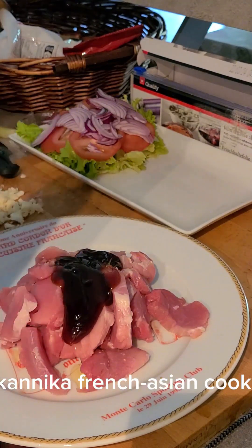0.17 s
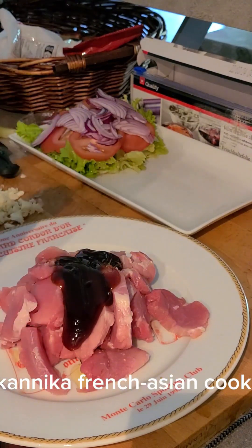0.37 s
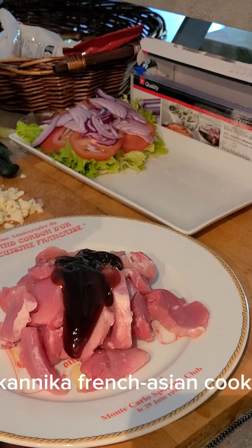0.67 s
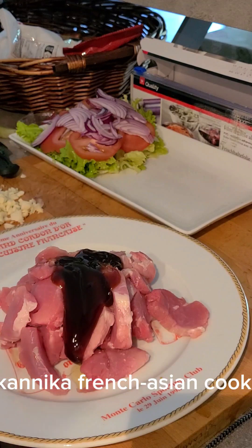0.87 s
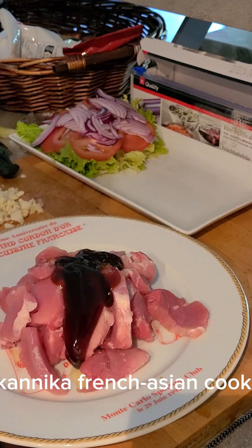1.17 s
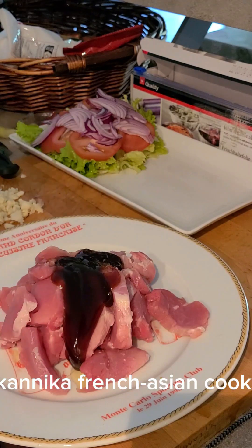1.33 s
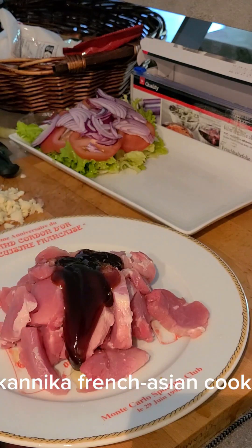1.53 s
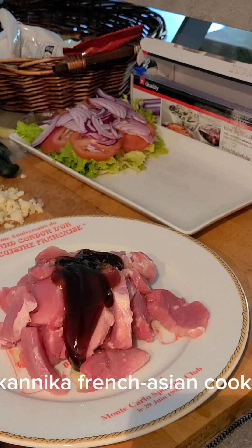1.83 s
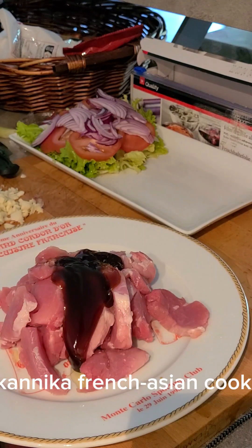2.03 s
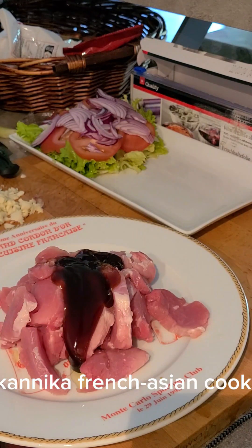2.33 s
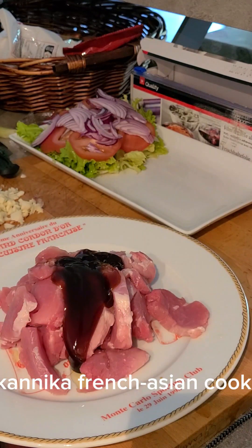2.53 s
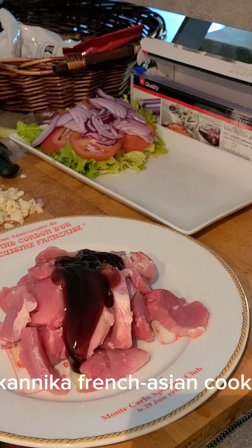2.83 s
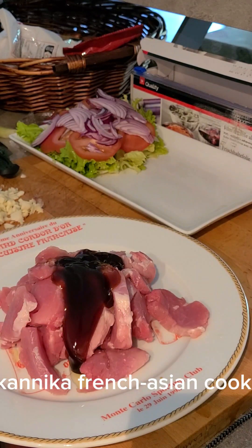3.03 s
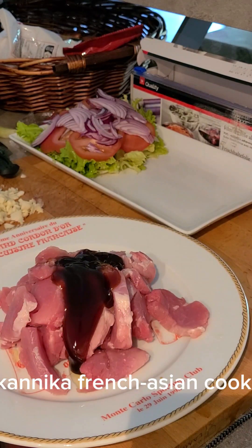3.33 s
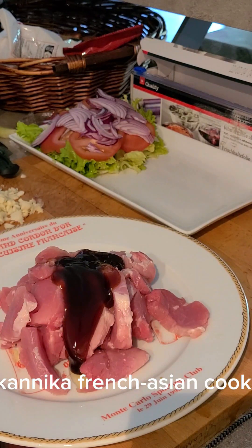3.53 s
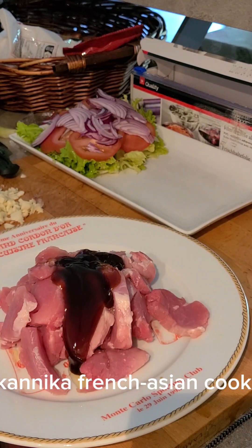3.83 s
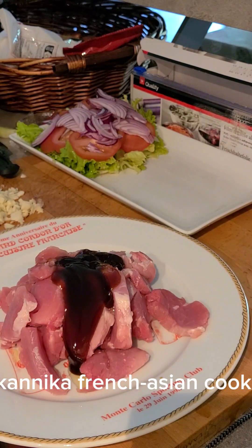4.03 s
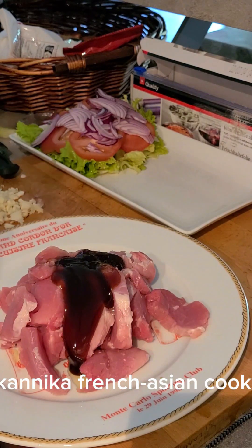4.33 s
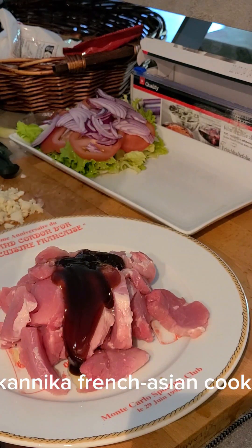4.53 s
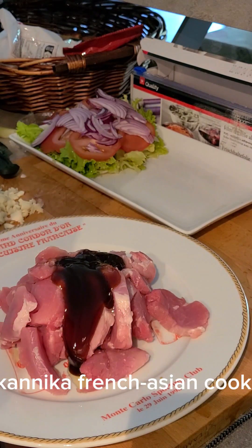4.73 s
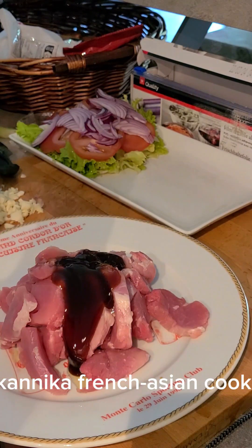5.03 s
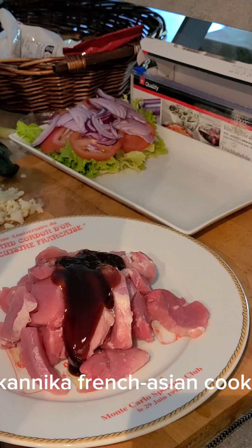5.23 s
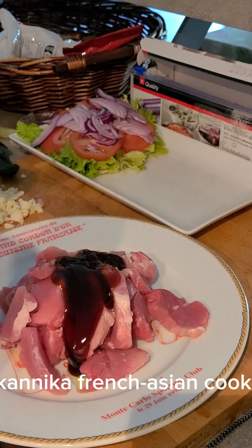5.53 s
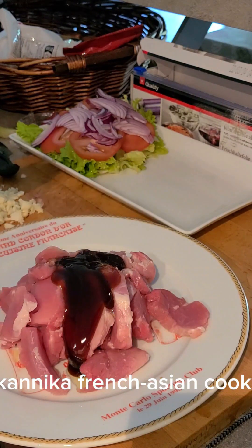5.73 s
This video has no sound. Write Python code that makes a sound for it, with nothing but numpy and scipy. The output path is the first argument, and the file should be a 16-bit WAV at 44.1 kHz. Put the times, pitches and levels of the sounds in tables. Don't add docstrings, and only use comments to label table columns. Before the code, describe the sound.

Close phone pickup in a small, moderately live kitchen. Fridge hum runs beneath sparse handling noises: soft touches, a sharp glassy clink that bounces, a cap popping loose. The loudest event is a deep wooden blow before the middle, bouncing and rattling into low bumps. Afterwards come a tiny metallic tinkle, scuffs, a dry sliding palm, a crisp double snap ringing a tin, then little clinks dying away.

```python
import sys
import numpy as np
from scipy import signal
from scipy.fft import rfft, irfft, next_fast_len
from scipy.io import wavfile
from scipy.ndimage import uniform_filter1d

SR = 44100
rng = np.random.default_rng(int(sys.argv[2]) if len(sys.argv) > 2 else 0)


def gain_from_decibels(decibels):
    exponent = np.asarray(decibels, float) / 20
    return 10 ** exponent


def persist_wave(psi):
    counts = np.round(np.clip(psi, -1, 1) * 32767).astype(np.int16)
    wavfile.write(sys.argv[1], SR, np.atleast_2d(counts).T)


N = 260057
LONG, SHORT = 24000, 6000

# time in seconds, level in dB.
DRONE_LEVEL = [(0, -44.5), (.25, -52), (.6, -51.5), (1.0, -51.5), (1.3, -49.5), (2.2, -53.5), (3.0, -52.5),
               (3.51, -49), (3.96, -53.5), (4.6, -49), (5.1, -49.5), (5.4, -49), (5.7, -52), (5.9, -49)]
# frequency in Hz, density in dB per Hz.
FRIDGE_SPECTRUM = [(12, -49), (20, -28.5), (38, -13.5), (75, -11), (97, -6), (114, 2.5), (132, -5),
                   (166, -12), (211, -17), (245, -13), (398, -20), (437, -20.5), (500, -27.5), (650, -40.5),
                   (1100, -120)]
# time in seconds, level in dB, swell in seconds, fade in seconds.
FRIDGE_SHUDDER = [
    (2.6, -39, 0.16, 0.097),
]
# frequency in Hz, width in Hz, level in dB.
MOTOR_WHINES = [(633.4, 12, -69), (1240, 54, -71), (3272, 61, -69.5)]
# frequency in Hz, density in dB per Hz.
AIR_SPECTRUM = [(180, -22), (300, -4.5), (437, -20), (557, -6), (621, -12.5), (995, -14), (1230, -15.5),
                (1620, -22), (2290, -22.5), (3040, -23), (3340, -21), (5140, -25.5), (7500, -29),
                (9750, -98), (16500, -120)]
# frequency in Hz, density in dB per Hz.
HISS_SPECTRUM = [(7000, -57), (7700, -27), (8300, -6.5), (10500, -4.5), (11500, 1.5), (15000, -2.5),
                 (15800, -11)]
# frequency in Hz, T60 in seconds.
ROOM_T60 = [(100, 0.39), (400, 0.43), (1500, 0.42), (4000, 0.42), (10000, 0.28), (15000, 0.4)]
# frequency in Hz, left over right in dB.
PORT_BALANCE = [(60, -2.5), (110, -1.5), (200, -3), (380, -3.5), (700, -3.5), (1290, -3), (2380, -6),
                (4400, -8), (8120, -5.5), (15000, -4)]
# time in seconds, lead of the left port in samples.
LEFT_LEAD = [(0, 6), (.03, -2), (.4, -12), (.9, -12), (1, 12), (1.4, 7), (2, 7), (2.4, 0), (3, -4),
             (4.7, -4), (4.8, 7), (5.9, 9)]

# time of most pressure in seconds, level in dB, sizzle in dB,
# swell in seconds, fade in seconds.
BRUSH_STROKES = [(0.027, -55, 4.5, 0.0043, 0.047), (0.666, -63, 8, 0.0058, 0.023),
                 (0.68, -52.5, -16, 0.022, 0.13), (1.27, -64, -9, 0.049, 0.085),
                 (1.39, -57, -12, 0.057, 0.2), (1.811, -54.5, -2.5, 0.088, 0.098),
                 (2.417, -58, 6.5, 0.064, 0.01), (2.445, -38.5, -7, 0.023, 0.034),
                 (2.925, -56, 4.5, 0.15, 0.13), (3.01, -61, -17, 0.027, 0.1),
                 (3.396, -54, -33, 0.0099, 0.085), (3.76, -60.5, -26, 0.14, 0.1),
                 (3.84, -59, -1, 0.055, 0.044), (3.878, -67, 15.5, 0.015, 0.076),
                 (4.06, -60, -4, 0.11, 0.37), (4.27, -65, -35, 0.32, 0.13), (4.37, -43, -4, 0.076, 0.28),
                 (4.813, -46.5, 14, 0.0017, 0.03), (4.843, -54.5, 15, 0.048, 0.097)]
# frequency in Hz, density in dB per Hz.
CLOTH_SPECTRUM = [(240, -29), (400, -11), (575, -4), (644, -10.5), (1020, -14), (1100, -2), (1330, -18),
                  (1510, -8), (3920, -5.5), (6800, -15.5), (8000, -37), (10400, -53), (17600, -120)]
# frequency in Hz, density in dB per Hz.
SIZZLE_SPECTRUM = [(5000, -8.5), (7500, 1), (9000, -8), (13000, -4), (15700, -3.5)]
# time in seconds, level in dB, swell in seconds, fade in seconds.
PALM_RUB = [
    (4.38, -45.5, 0.24, 0.28),
]
# frequency in Hz, width in Hz, level in dB.
SKIN_BANDS = [(2900, 1000, 0), (4030, 1500, -1), (5340, 1100, -17.5)]

# time in seconds, peak in dB, ring in Hz, sizzle in dB.
TICKS = [(0.0265, -38.5, 5730, -16), (0.3542, -45, 5900, -8), (0.4771, -41.5, 5540, -29),
         (0.529, -23, 5800, -17), (0.5507, -34.5, 6170, -8.5), (0.552, -40, 11500, -6.5),
         (0.5577, -34, 3300, -13.5), (0.562, -40, 9000, -3), (0.577, -54, 6000, -5.5),
         (0.6635, -41, 13000, -3), (0.668, -44, 11500, -8), (0.9343, -52.5, 3740, -22.5),
         (1.2795, -44, 9300, -3), (2.382, -47, 4070, -1), (2.4354, -27.5, 3350, -8),
         (3.8745, -32, 5700, -20), (4.0709, -37.5, 5030, -9), (4.5565, -33.5, 5300, -17),
         (4.557, -38, 7500, -17), (4.5702, -38, 4200, -26), (4.571, -48, 5800, -20),
         (4.621, -51, 6500, -13), (4.9716, -36.5, 7040, -17.5), (4.9813, -36.5, 11820, -6.5),
         (4.9973, -35.5, 6000, -28), (5.0424, -32, 4850, -12), (5.068, -52, 5000, -2),
         (5.0538, -35.5, 6800, -22.5), (5.1015, -44, 8930, -14.5), (5.1814, -47, 5300, -18),
         (5.1955, -44, 6960, -8), (5.5744, -51, 5300, 1), (5.7412, -36, 11400, -19.5)]
# time in seconds, peak in dB, ring in Hz, sizzle in dB.
SNAPS = [(1.0545, -10.5, 6320, -26), (1.0579, -15, 4780, -20), (1.059, -52, 6660, -23),
         (1.4706, -35, 6700, -19.5), (1.4839, -25, 6400, -12.5), (1.489, -26, 3280, -5),
         (4.8093, -18.5, 7000, -9), (4.813, -17, 13200, -1), (4.8133, -23, 13200, -10),
         (4.8129, -17, 6300, -7.5), (4.8145, -17.5, 11800, -4), (4.833, -19, 6900, -3),
         (4.848, -29, 6300, -10), (4.826, -24, 5550, 4), (4.842, -28.5, 11800, -8),
         (4.8412, -25, 5270, -21.5), (4.845, -26, 5840, -7)]
# time in seconds, peak in dB, ring in Hz, T60 in seconds.
TAPS = [(0.4775, -46, 3000, 0.014), (0.478, -45, 555, .03), (0.5285, -37, 2150, 0.03),
        (0.5275, -36.5, 447, .015), (0.55, -30.5, 3100, .04), (0.55, -32, 1690, 0.016),
        (0.5573, -30, 1490, 0.027), (0.669, -41, 2000, 0.055), (0.7445, -43, 2800, .014),
        (0.829, -50, 1800, .015), (1.0551, -17, 4790, 0.05), (1.231, -38, 1520, 0.038),
        (1.271, -43, 1540, 0.037), (1.3085, -38, 2100, 0.048), (1.42, -41, 1640, 0.07),
        (1.056, -26, 2700, 0.095), (1.489, -30.5, 1300, 0.032), (1.505, -24, 1680, 0.015),
        (2.429, -20, 1500, 0.062), (2.4407, -13.5, 1000, 0.038), (2.463, -24.5, 900, .05),
        (2.482, -25.5, 1050, .08), (2.5935, -35, 760, 0.023), (3.0086, -59, 1046, 0.036),
        (3.3895, -44, 2800, 0.023), (4.8099, -25, 1770, 0.01), (4.8096, -22, 2900, 0.067),
        (4.8398, -27, 2120, 0.0057), (4.921, -42.5, 1200, 0.069), (4.8105, -39, 560, 0.0085),
        (5.053, -41, 1490, 0.033), (5.0652, -34, 2400, 0.045), (5.2385, -43, 3320, 0.03),
        (5.071, -54, 2480, 0.1), (5.185, -40, 2730, 0.08), (4.843, -31, 2400, 0.03),
        (5.1778, -40.5, 1240, 0.06), (5.2387, -42.5, 1800, 0.024), (5.0425, -36, 1500, 0.02),
        (1.33, -46.5, 1220, .05), (4.333, -48, 1800, .03), (5.8035, -54, 1120, 0.026)]
# time in seconds, peak in dB, ring in Hz.
SCUFFS = [(0.4205, -55, 3940), (0.519, -42, 5900), (0.651, -54, 4240), (1.041, -32, 6600),
          (1.043, -34, 5000), (1.598, -44, 4950), (1.37, -44, 6640), (1.27, -44, 5940), (3.1677, -57, 4800),
          (3.3878, -41.5, 5100), (3.821, -36, 5300), (3.8395, -35.5, 4930), (4.0153, -41, 4700),
          (5.605, -50.5, 5030)]

# frequency in Hz, level in dB, T60 in seconds.
GLASS_MODES = [(2400, -17, 0.18), (3300, -7.5, 0.17), (3634, -10, 0.42), (4240, -10, 0.15),
               (4960, -9, 0.099), (5141, -30, 0.4), (5540, -21, 0.41), (6200, -22, 0.36), (6640, -1, 0.23),
               (7500, -12, 0.23), (8802, -26.5, 0.3), (9400, -17.5, 0.3), (10900, -25, 0.2),
               (11500, -18, 0.3)]
# time in seconds, level in dB, left over right in dB.
GLASS_HITS = [
    (1.046, -41, -11),
    (1.0549, -20, -5.5),
    (1.083, -30, -4),
    (1.126, -34.5, -4.5),
    (1.216, -46.5, -4),
]
# frequency in Hz, level in dB, T60 in seconds.
SPOON_MODES = [(2110, -13.5, 0.51), (4215, -7, 0.13), (5350, 0, 0.068), (5030, -9, .35), (6160, -5, 0.18)]
# time in seconds, level in dB, left over right in dB.
SPOON_HITS = [
    (3.4587, -43.5, -8),
    (3.5211, -50.5, -6),
    (3.6039, -56, -6),
]
# frequency in Hz, level in dB, T60 in seconds.
TINES_MODES = [(8300, -8, .06), (10120, -12, .12), (11100, -10, 0.17), (11720, -7, 0.14), (12270, -2, 0.13)]
# time in seconds, level in dB, left over right in dB.
TINES_HITS = [
    (3.4587, -47.5, -1),
]
# frequency in Hz, level in dB, T60 in seconds.
CAP_MODES = [(1300, -8, 0.09), (1520, -3.5, 0.073), (1640, -5.5, 0.06), (2840, -10.5, 0.048),
             (3680, -10, 0.15), (4730, -14, 0.066), (5560, -10, 0.081), (7000, 3, 0.027)]
# time in seconds, level in dB, left over right in dB.
CAP_HITS = [
    (1.0569, -31, -9),
    (1.4728, -29.5, -2),
    (1.4895, -28, -5),
]
# frequency in Hz, level in dB, T60 in seconds.
POP_MODES = [(1480, 0, .018)]
# time in seconds, level in dB, left over right in dB.
POP_HITS = [
    (1.4851, -14, 0),
]
# frequency in Hz, level in dB, T60 in seconds.
BOWL_MODES = [(213.3, 6.5, 0.19), (296, -10, 0.083), (790, -12.5, .1)]
# time in seconds, level in dB, left over right in dB.
BOWL_HITS = [
    (0.004, -36, 1),
    (0.027, -43, 1),
    (0.06, -42.5, 1),
]
# frequency in Hz, level in dB, T60 in seconds.
RIM_MODES = [(1385, 2, 0.083), (2000, -8, 0.027), (2700, -4, 0.02), (3100, -12, .025), (5350, 1, 0.045),
             (6080, 3, .025), (6700, -1, .025)]
# time in seconds, level in dB, left over right in dB.
RIM_HITS = [
    (0.0265, -36, -3),
]
# frequency in Hz, level in dB, T60 in seconds.
LID_MODES = [(1360, -1.5, 0.19), (2100, -4, 0.17)]
# time in seconds, level in dB, left over right in dB.
LID_HITS = [
    (5.064, -36.5, 0),
    (5.126, -53, 0),
    (5.18, -43, 0),
]
# frequency in Hz, level in dB, T60 in seconds.
JAR_MODES = [(2786, 2.5, 0.069), (3430, -1.5, .04)]
# time in seconds, level in dB, left over right in dB.
JAR_HITS = [
    (5.055, -33.5, 1),
    (5.064, -36.5, 4),
    (5.09, -43, 2),
    (5.098, -50, 8),
    (5.181, -45, -2),
    (5.196, -48, 2),
]
# frequency in Hz, level in dB, T60 in seconds.
TIN_MODES = [(1903, 1, 0.0506), (3000, 3.5, 0.066), (4800, 2.5, 0.076), (6300, -7, 0.051), (7300, 5, .05),
             (9300, 2, 0.073), (11800, -1, .07), (13700, -9, .12)]
# time in seconds, level in dB, left over right in dB.
TIN_HITS = [
    (4.811, -31.5, 2),
    (4.828, -38, 0),
    (4.8417, -32, -0.84),
]
# frequency in Hz, level in dB, T60 in seconds.
PLATE_MODES = [(2220, -2, 0.097), (2900, 3, .12), (4350, -7.5, .2), (5470, -11, 0.29), (6121, -5.5, 0.12),
               (6993, -6, .4), (7300, 0, 0.24), (10100, -21.5, 0.13)]
# time in seconds, level in dB, left over right in dB.
PLATE_HITS = [
    (1.0552, -28, -4),
    (1.082, -42, -5),
]
# frequency in Hz, level in dB, T60 in seconds.
BEAD_MODES = [(7100, 0.5, .05)]
# time in seconds, level in dB, left over right in dB.
BEAD_HITS = [
    (5.053, -38.5, -2),
]
# frequency in Hz, level in dB, T60 in seconds.
DISH_MODES = [(2380, 1, 0.12)]
# time in seconds, level in dB, left over right in dB.
DISH_HITS = [
    (2.439, -28, 0),
]

# time in seconds, level in dB.
HEAVY_BLOW = (2.4293, -3.8)
# frequency in Hz, level in dB, T60 in
# seconds.
COUNTER_MODES = [(107.3, -14, 0.46), (141.8, -16.5, 0.82), (215, -12, 0.28), (307, -10.5, 0.2),
                 (578.4, -20.5, 0.19), (712, -12.5, 0.076), (854, -26, 0.052), (1035, -17.5, 0.11),
                 (1083, -21, 0.13), (1247, -22.5, 0.12), (1520, -22, 0.086), (1680, -22.5, 0.12),
                 (3200, -21.5, 0.11),
                 (330, 6, .03), (395, -8, .06)]
# time in seconds, peak in dB, ring in Hz, rattle in dB.
KNOCKS = [(2.4408, -16, 349, -4), (2.4573, -12.5, 224, -11.5), (2.4668, -9, 241, -13),
          (2.477, -13.5, 239, -12.5), (2.4935, -13.5, 269, -15), (2.52, -23, 135, -32),
          (2.552, -45, 153, -34), (2.5913, -18.5, 300, -15), (2.638, -25, 113, -22),
          (2.657, -21.5, 216, -28), (2.71, -24.5, 116.6, -24), (2.751, -32.5, 113, -33),
          (2.875, -36, 146, -25), (3.019, -35, 250, -7), (3.03, -33.5, 244, -15), (3.044, -38, 394, -10),
          (3.057, -29, 176, -15.5), (3.101, -33, 250, -18), (3.186, -30, 148, -28), (3.199, -37, 330, -18),
          (3.2126, -28, 169, -14), (3.226, -41, 190, -22), (4.34, -42, 255, 6)]
# frequency in Hz, width in Hz, level in dB.
CUPBOARD_BANDS = [(500, 446, 9), (980, 1030, 0.5), (2400, 870, -9), (3160, 1700, -18)]


def unit(x):
    return x / np.sqrt(np.mean(x ** 2) + 1e-20)


def along(points, hz):
    f, v = np.transpose(points)
    return np.interp(np.log(hz + 1), np.log(f + 1), v)


def filtered(x, response):
    m = next_fast_len(x.shape[-1] + 4096)
    return irfft(rfft(x, m) * response(np.fft.rfftfreq(m, 1 / SR)), m)[..., :x.shape[-1]]


def peak(f, hz, width_hz):
    return 1j * f * width_hz / (hz * hz - f * f + 1j * f * width_hz)


def swell(s, db, swell_s, fade_s):
    t = np.arange(N) / SR - s
    bend = 1.67
    return gain_from_decibels(db - 20 * np.abs(t / np.where(t < 0, swell_s, fade_s)) ** bend)


def diffuse(pair):
    spacing_m, sound_speed = 0.2, 343

    def blend(f):
        turn = np.arccos(np.sinc(2 * f * spacing_m / sound_speed)) / 2
        return np.array([np.cos(turn), np.sin(turn)])

    mid, side = filtered(pair, blend)
    return filtered(np.array([mid + side, mid - side]),
                    lambda f: gain_from_decibels(np.outer([.5, -.5], along(PORT_BALANCE, f))))


def rush(gain, patchy_db):
    z = signal.stft(rng.standard_normal((2, N)), nperseg=512)[2]
    field = uniform_filter1d(rng.standard_normal(z.shape[1:]), size=5, axis=0)
    field = uniform_filter1d(field, size=10, axis=1)
    pair = signal.istft(z * gain_from_decibels(patchy_db * unit(field)), nperseg=512)[1][:, :N]
    left_lag_s = .00022
    late = lambda f: np.exp(-2j * np.pi * np.outer([left_lag_s, 0], f))
    return unit(filtered(diffuse(filtered(pair, gain)), late))


def add(out, s, direct, wet_db):
    hz, t, z = signal.stft(rng.standard_normal((2, LONG)), SR, nperseg=256)
    decay = gain_from_decibels(-60 * t / along(ROOM_T60, hz)[:, None])
    tail = diffuse(signal.istft(z * decay, SR, nperseg=256)[1])
    tail *= 1 - np.exp(-np.arange(tail.shape[1]) / SR / 0.00052)
    tail /= np.sqrt(np.sum(tail ** 2) / 2)
    wet = signal.fftconvolve(direct[1:], tail, axes=1)[:, :LONG]
    start, lead = round(s * SR), round(np.interp(s, *np.transpose(LEFT_LEAD)))
    for side, late, part in zip(out, (max(-lead, 0), max(lead, 0)), direct):
        side[start + late:][:len(part)] += part
    out[:, start:][:, :LONG] += gain_from_decibels(wet_db) * wet


def burst(t60, rise, response):
    t = np.arange(SHORT) / SR
    envelope = gain_from_decibels(-60 * t / t60) * (1 - np.exp(-t / rise))
    x = filtered(rng.standard_normal((2, SHORT)) * envelope, response)
    return x / np.abs(x).max(axis=1, keepdims=True)


def ring(modes, damp, rough, lag):
    t, out = np.arange(LONG) / SR, 0
    build_cycles = .6
    for hz, db, t60 in modes:
        waver = uniform_filter1d(np.cumsum(rng.standard_normal(LONG)), size=60) * rough * np.sqrt(hz / SR)
        step = rng.normal(0, 2 * np.pi * hz * lag, (2, 1))
        tilt_db = rng.normal(0, 1.5, (2, 1))
        decay = gain_from_decibels(db + tilt_db - 60 * t / (damp * min(t60, .6)))
        build = 1 - np.exp(-t * hz / build_cycles)
        out = out - decay * np.sin(2 * np.pi * hz * t + waver + step) * build
    return out


def fridge():
    s, db = np.transpose(DRONE_LEVEL)
    level = gain_from_decibels(np.interp(np.arange(N) / SR, s, db) + 3) + swell(*FRIDGE_SHUDDER[0])
    drone = level * rush(lambda f: gain_from_decibels(along(FRIDGE_SPECTRUM, f)), patchy_db=1.5)
    motor = 0
    for hz, width_hz, whine_db in MOTOR_WHINES:
        motor = motor + gain_from_decibels(whine_db) * rush(lambda f: peak(f, hz, width_hz) ** 2, patchy_db=-2.7)
    air = gain_from_decibels(-59) * rush(lambda f: gain_from_decibels(along(AIR_SPECTRUM, f)), patchy_db=.8)
    hiss = gain_from_decibels(-74) * rush(lambda f: gain_from_decibels(along(HISS_SPECTRUM, f)), patchy_db=.5)
    return drone + motor + air + hiss


def brushing():
    dull, bright = 0, 0
    for s, db, sizzle_db, swell_s, fade_s in BRUSH_STROKES:
        dull = dull + swell(s, db, swell_s, fade_s)
        bright = bright + swell(s, db + sizzle_db, swell_s, fade_s)
    grain = gain_from_decibels(1.9 * unit(uniform_filter1d(rng.standard_normal(N), size=90)))
    cloth = dull * rush(lambda f: gain_from_decibels(along(CLOTH_SPECTRUM, f)), patchy_db=.8)
    sizzle = bright * rush(lambda f: gain_from_decibels(along(SIZZLE_SPECTRUM, f)), patchy_db=.6)
    return unit(grain) * (gain_from_decibels(.5) * cloth + sizzle)


def rub():
    skin = lambda f: sum(gain_from_decibels(db) * np.abs(peak(f, hz, width_hz)) ** 2 for hz, width_hz, db in SKIN_BANDS)
    grain = gain_from_decibels(0.5 * unit(uniform_filter1d(rng.standard_normal(N), size=150)))
    return swell(*PALM_RUB[0]) * unit(grain) * rush(skin, patchy_db=1.2)


def ticks():
    out = np.zeros((2, N + 2 * LONG))
    sides = lambda pan_db: gain_from_decibels([[pan_db / 2], [-pan_db / 2]])
    for s, db, hz, sizzle_db in sorted(TICKS + SNAPS):
        t60 = 0.014 * gain_from_decibels(0.12 * (db + 46.5))

        def contact(f):
            broad = peak(f, hz, 0.53 * hz) ** 2
            narrow = gain_from_decibels(3.5) * peak(f, hz, 0.054 * hz)
            dull = gain_from_decibels(-11.5) * peak(f, 4000, 2600)
            return broad + narrow + dull

        crack = burst(t60, 0.00015, contact) * sides(-6.5)
        sizzle = burst(0.55 * t60, 0.00034, lambda f: peak(f, 14100, 10200) ** 2) * sides(-2)
        add(out, s + .0007, gain_from_decibels(db + 1.5) * (crack + gain_from_decibels(sizzle_db + 4) * sizzle), wet_db=-7.5)
    return out[:, :N]


def taps():
    out = np.zeros((2, N + LONG))
    dull = [(*row, 0.54) for row in TAPS]
    scuffs = [(*row, 0.056, 0.28) for row in SCUFFS]
    for s, db, hz, t60, wide in dull + scuffs:
        a, b = burst(np.clip(t60, .003, .12), .0025, lambda f: peak(f, hz, wide * hz) ** 2)
        add(out, s, gain_from_decibels(db) * np.array([.6 * a + .4 * b, 1.1 * a]), wet_db=-7)
    return out[:, :N]


def knocks():
    out, t = np.zeros((2, N + LONG)), np.arange(SHORT) / SR
    blow_s, blow_db = HEAVY_BLOW
    counter = ring(COUNTER_MODES, damp=.9, rough=.1, lag=.0001)
    add(out, blow_s, gain_from_decibels(blow_db) * gain_from_decibels([[-1], [1]]) * counter, wet_db=-7)

    def cupboard(f):
        return sum((-1) ** k * gain_from_decibels(db) * peak(f, hz, w) for k, (hz, w, db) in enumerate(CUPBOARD_BANDS))

    thud_t60 = 0.064
    for s, db, hz, rattle_db in KNOCKS:
        thud = -np.sin(2 * np.pi * hz * t) * gain_from_decibels(-60 * t / thud_t60) * (1 - np.exp(-t / 0.00023))
        rattle = burst(1.34 * thud_t60, 0.00085, cupboard)
        rattle[0] = 1.07 * rattle[0] + 0.089 * rattle[1]
        pulse = thud + gain_from_decibels(rattle_db) * rattle
        add(out, s + .0015, gain_from_decibels(db) * pulse * gain_from_decibels([[-.9], [.9]]), wet_db=-7)
    return out[:, :N]


def clinks():
    out = np.zeros((2, N + LONG))
    things = [(GLASS_MODES, GLASS_HITS, .5, .26), (SPOON_MODES, SPOON_HITS, .9, .35),
              (CAP_MODES, CAP_HITS, .5, .4), (BOWL_MODES, BOWL_HITS, .9, .2),
              (RIM_MODES, RIM_HITS, .9, .2), (LID_MODES, LID_HITS, .8, .28),
              (POP_MODES, POP_HITS, .9, .05), (JAR_MODES, JAR_HITS, .9, .7),
              (TIN_MODES, TIN_HITS, .9, .5), (TINES_MODES, TINES_HITS, .9, .3),
              (PLATE_MODES, PLATE_HITS, .5, .5), (BEAD_MODES, BEAD_HITS, .9, .3),
              (DISH_MODES, DISH_HITS, .9, .3)]
    for modes, hits, damp, rough in things:
        for s, db, pan_db in hits:
            stroke = ring(modes, damp, rough, lag=.00003)
            add(out, s, stroke * gain_from_decibels([[db + pan_db / 2], [db - pan_db / 2]]), wet_db=-9)
    return out[:, :N]


def scene():
    close = brushing() + rub() + ticks() + taps() + knocks() + clinks()

    def case(f):
        shadow = 1 - 0.79 * peak(f, 7960, 880)
        bass_cut = (1j * f / (70 + 1j * f)) ** 2
        return shadow * bass_cut / (1 + (f / 15000) ** 12)

    return fridge() + filtered(close, case)


def top_cut(x):
    return signal.sosfilt(signal.butter(12, 16660, fs=SR, output="sos"), x)


def record(dry):
    soft = dry / (1 + np.abs(dry / 1.3) ** 4) ** .25
    mix = filtered(soft, lambda f: f < 15750)
    return top_cut(mix)


dry = scene()
out = record(dry)
persist_wave(out)
```